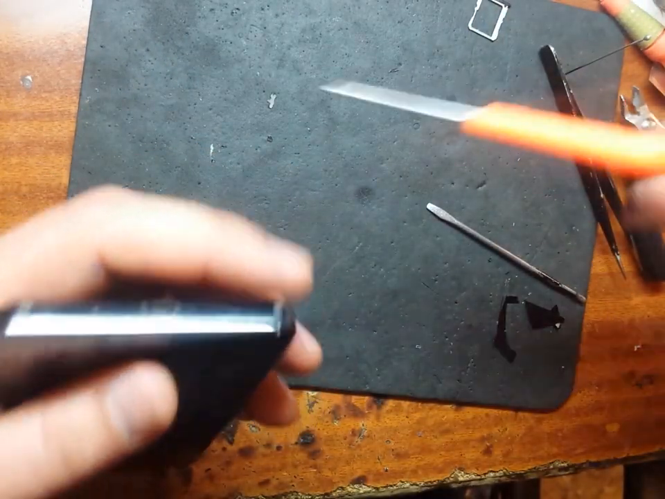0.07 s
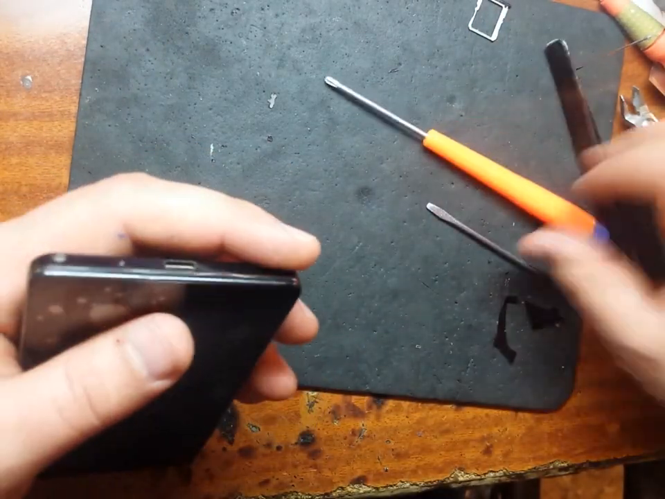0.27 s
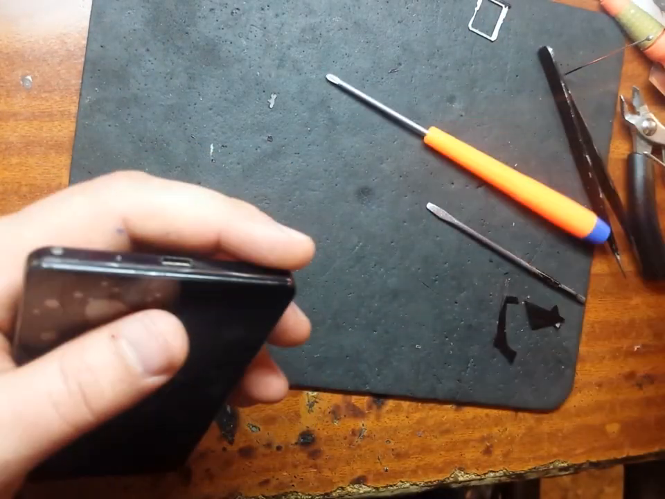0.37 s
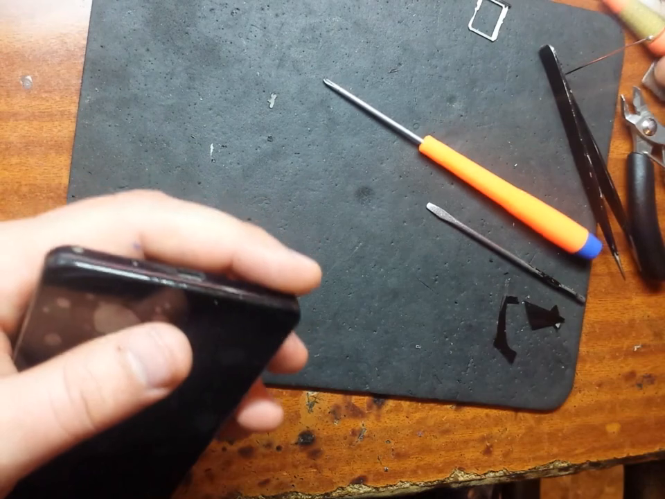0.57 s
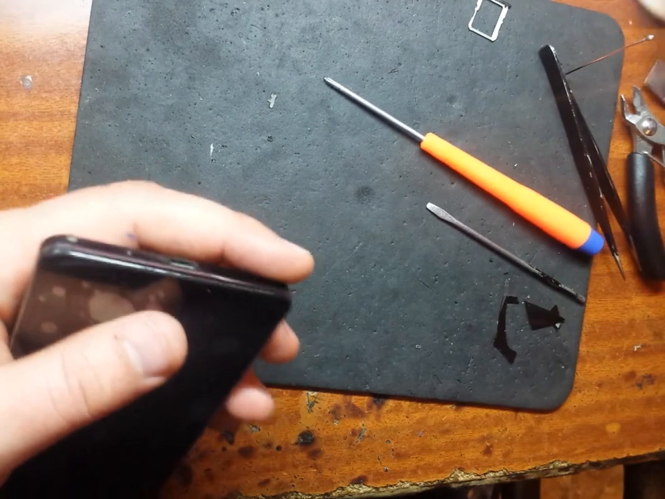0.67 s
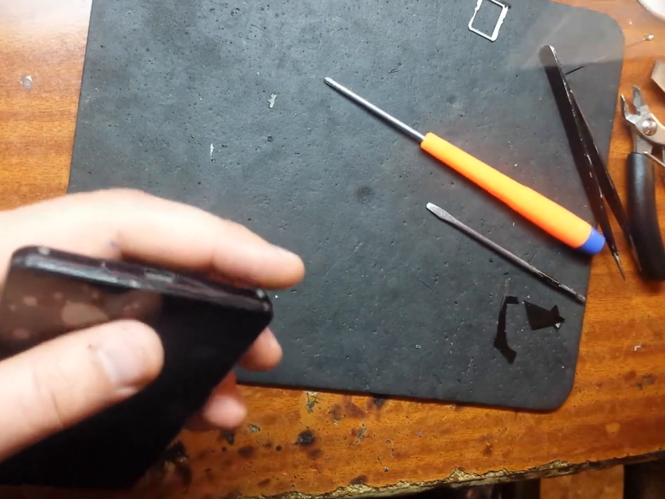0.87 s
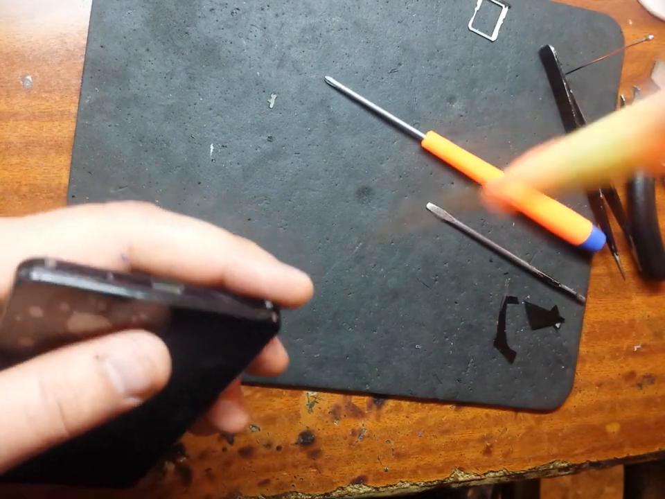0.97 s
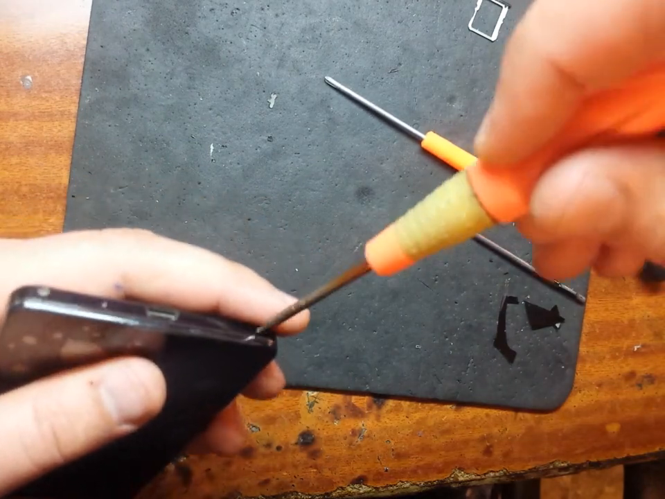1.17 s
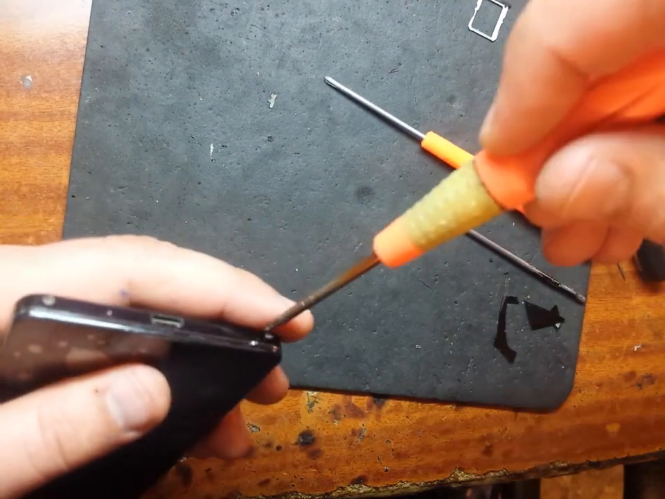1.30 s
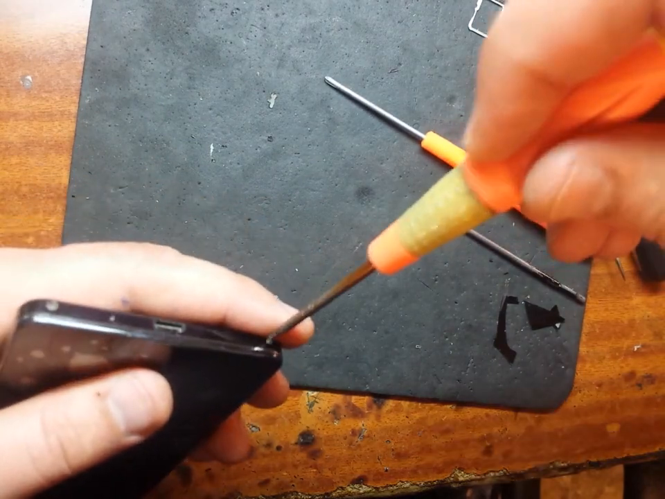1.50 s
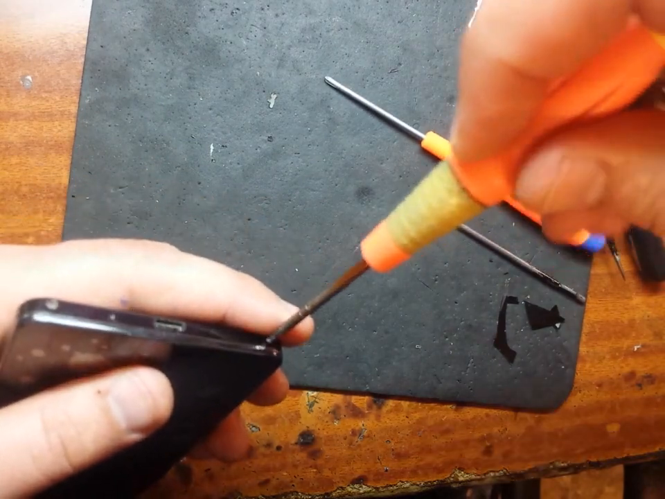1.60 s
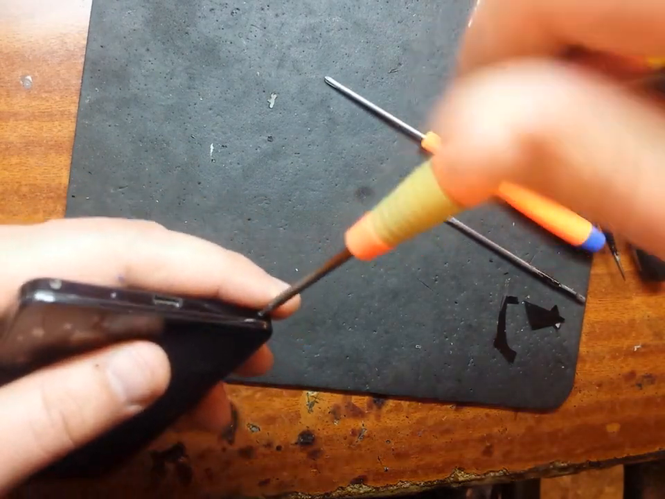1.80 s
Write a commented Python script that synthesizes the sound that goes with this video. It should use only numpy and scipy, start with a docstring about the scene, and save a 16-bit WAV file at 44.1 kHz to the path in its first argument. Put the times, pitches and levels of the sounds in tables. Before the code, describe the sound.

Screwdriver clatters down on a rubber-matted bench, another tool is picked up with knocks and clinks

```python
"""A small screwdriver is laid on a rubber mat over a wooden bench, bounces and settles; another tool is picked up,
clinking and knocking, then its tip ticks faintly on a phone. Each blow is a noisy snap plus fading sine waves.
Filtered grains of noise make rubbing and a soft midband wash under the knocks and clatter; random echoes stand
for the room. Shaped noise is the room tone; a preset curve imitates an automatic gain that ducks it around loud
blows and slowly lets it recover. Two microphone ports hear it, the left one brighter around its port resonance."""
import sys
import numpy as np
from scipy import signal
from scipy.fft import rfft, irfft
from scipy.io import wavfile
from scipy.ndimage import uniform_filter1d

SR = 44100
rng = np.random.default_rng(int(sys.argv[2]) if len(sys.argv) > 2 else 0)


def generate_wav(sig):
    """Save sig (samples, or channels by samples) to the path in sys.argv[1] as 16-bit PCM at SR."""
    pcm = np.round(np.clip(np.atleast_2d(sig).T, -1, 1) * 32767).astype(np.int16)
    wavfile.write(sys.argv[1], SR, pcm)


def ratio(d):
    """dB to gain"""
    e = np.asarray(d, float) / 20
    return 10 ** e


N = 81585  # length in samples

# Levels in the tables are those before the microphone ports. In the five lists of blows, chatter_s is at least
# 0.0002 and tilt_db_per_octave brightens or dulls the ring. In the mode lists, level_db only compares the modes
# with each other, and t60_s (time to fade by 60 dB) is at least 0.002 in use.
# Screwdriver shaft and tip touching: start_s, peak_db, chatter_s, tilt_db_per_octave
SHAFT_TICKS = [(.0962, -21.5, 0.00098, -2.5), (.167, -22, 0.0004, -7), (.2258, -17.5, 0.00036, -14),
               (.2294, -8, 0.00081, 4.5), (.2345, -16.5, 0.0004, -1), (.239, -27, .0005, -19),
               (.2932, -26, 0.00092, -19), (.3259, -2.5, 0.00019, -3.5), (.328, -4.5, 0.0018, -4),
               (.358, -13.5, 0.0044, 5.5), (.371, -15, 0.0017, -1), (.390, -16.5, 0.0017, -5.5),
               (.395, -19.5, 0.0032, 1.5), (.9238, -33.5, .001, -18), (1.2466, -36, 0.00028, 9.5),
               (1.5928, -38, 0.0028, -1), (1.7444, -31.5, 0.00134, -4)]
# How the shaft and tip ring: pitch_hz, level_db, t60_s
SHAFT_MODES = [(2490, -6, 0.003), (3640, -4, 0.0038), (4360, -5, 0.0069), (5000, -8, 0.0057),
               (5300, 1, 0.011), (5875, 4, 0.015), (6860, -10.5, 0.012), (8600, -11.5, 0.0071),
               (11900, -14.5, 0.0011), (14300, -30, .004)]
# Handle landing on the bench: start_s, peak_db, chatter_s, tilt_db_per_octave
HANDLE_THUMPS = [(.227, -24.5, 0.0005, 0.5), (.327, -23.5, 0.00067, 5), (.334, -16, 0.0006, 1)]
# How the bench rings: pitch_hz, level_db, t60_s
BENCH_RING = [(97.3, -3.5, 0.26), (136.5, 2, 0.25), (166, 1.5, 0.18), (255, 6, 0.02), (328, -1.5, 0.16),
              (378, -4.5, 0.099), (795, -5.5, 0.013)]
# Plastic handle knocking as it is lifted (each port has its own gain later):
# start_s, peak_db, chatter_s, tilt_db_per_octave
HANDLE_KNOCKS = [(.6042, -2.5, 0.00038, 1.5), (.608, -8, 0.0012, 2.5), (.6132, -10.5, 0.0012, -3),
                 (.6148, -7.5, 0.0005, -3), (.6162, -9, 0.00038, -4.5), (.6285, -19, 0.00055, -1),
                 (.6348, -20.5, 0.0008, -2.5)]
# How the plastic handle rings: pitch_hz, level_db, t60_s
HANDLE_MODES = [(296, -24, 0.088), (547, -20.5, 0.0344), (938, -24.5, 0.077), (1170, -14, 0.08),
                (1590, -0.5, 0.026), (2550, 2.5, 0.014), (3040, 1, 0.0049), (3600, 0, 0.015),
                (4500, -12.5, 0.0073), (5550, 2, 0.019), (6040, -0.5, 0.0074), (8580, -23, 0.012)]
# Steel parts clinking together: start_s, peak_db, chatter_s, tilt_db_per_octave
STEEL_CLINKS = [(.6955, -7, 0.0056, -9), (.698, 1, 0.00017, 0), (.6995, -5, 0.0023, 5.5),
                (.7325, -3, 0.0002, -1), (.7345, -9, 0.0012, -6), (.7502, -9.5, 0.00018, -7.5),
                (.7535, -10, 0.0013, -2), (.7628, -7, 0.00022, -1.5), (.766, -13, 0.0012, -3),
                (.772, -19, .002, -4), (.7795, -23, 0.00091, -7)]
# How the steel parts ring: pitch_hz, level_db, t60_s
STEEL_MODES = [(1330, -23.5, 0.007), (2420, -13, 0.008), (3560, -1.5, 0.0043), (3950, -1.5, 0.0045),
               (4734, -7.5, 0.017), (5520, 6.5, 0.0066), (6300, 2, 0.0048), (6550, -13, 0.036),
               (7970, -11, 0.0018), (9800, -25.5, 0.0019), (11600, -31.5, 0.0026), (15600, -26, 0.002)]
# A heavier tool clunking on the bench: start_s, peak_db, chatter_s, tilt_db_per_octave
HEAVY_CLUNKS = [(.7962, -18.5, 0.00076, -8.5), (.7988, -11.5, .0004, -0.5), (.8017, -3.5, 0.0013, 5),
                (.8048, -7.5, 0.000333, -2.5), (.814, -19.5, 0.0009, -7), (.8292, -8, 0.0017, -1),
                (.8318, -14.5, 0.00054, 0), (.8352, -21.5, 0.0028, -5), (.850, -28, 0.00091, -14.5)]
# How the heavier tool rings: pitch_hz, level_db, t60_s
HEAVY_MODES = [(125, -22, 0.075), (216, -16, 0.052), (356, -8, 0.052), (521, -4, 0.075), (754, -1.5, 0.076),
               (1045, 0, 0.025), (1320, 2.5, 0.027), (1588, 5, 0.012), (2356, 0, 0.0063), (2610, -4, 0.016),
               (3040, 3, 0.0096), (3740, -9, 0.0035), (5800, -10, 0.021)]
# Rubbing noise, and soft midband wash under the knocks and clatter (the rows near 1100 to 1500 Hz):
# start_s, length_s, rms_db (before the fade), pitch_hz (the band is set around it)
RUBS_AND_WASH = [(0.33, 0.12, -40, 5000), (0.536, 0.08, -40, 4500), (0.62, 0.089, -36, 1500),
                 (0.733, .055, -28, 4500), (.735, .17, -38, 1090), (1.668, 0.075, -62.5, 5550)]
# Room tone level as an automatic gain would duck it around loud blows and slowly let it recover:
# time_s, level_db
TONE_DUCKING = [(0, -38.5), (0.291, -40), (.32, -45), (.335, -39), (0.581, -38.5), (.6, -50), (.62, -37.5),
                (0.671, -37), (.695, -49.5), (.725, -42), (0.78, -43), (.9, -49), (1.0, -50.5),
                (1.3, -51.5), (1.68, -50), (1.77, -46), (1.85, -44)]
# Colour of the room tone, only comparing pitches with each other: pitch_hz, level_db_per_hz
TONE_COLOUR = [(30, -13.5), (60, -6.5), (85, -8), (127, -3.5), (200, -8.5), (340, -10), (590, -17),
               (880, -12.5), (1700, -17), (3500, -19.5), (5800, -20.5), (7000, -27.5), (9000, -39.5),
               (14000, -57), (15700, -66)]
# How alike the two ports hear the room, 1 being the same: pitch_hz, likeness
PORT_LIKENESS = [(60, 1), (180, 0.95), (550, 0.71), (1650, -0.12), (4970, 0.083), (15000, -0.11)]
# How much stronger the left port is than the right: pitch_hz, level_db
LEFT_BRIGHTER = [(60, 2.5), (300, 0), (900, 1.5), (1800, 3), (3400, 5.5), (5700, 15), (7000, 5), (8300, -1),
                 (12000, -7), (15000, -1)]
# How long the walls' echoes last: pitch_hz, t60_s
WALL_FADE = [(200, 0.37), (1000, 0.36), (3000, 0.19), (6500, 0.34), (11000, 0.082)]

ROOM_DB, NEAR_DB = -10, -11.5  # strength of wall echoes and bench scatter, before the treble cut
NEAR_T60_S, DULL_HZ = 0.02, 6800  # fade of the bench scatter, treble cut of all echoes
RISE_CYCLES = 0.31  # time constant of a mode's rise, in its own cycles
SIDE_DB, VARY_DB = -6, 1.5  # side modes under their centre, random spread of mode levels
GRIT, SHARED = 0.12, 0.14  # strength of the chatter, part of it common to both ports
SNAP_T60_S, SKIRT_DB = 0.0042, -35.5  # fade of the snap's noise, its fall an octave beyond the outer modes
RIGHT_LAG_S = 0.00022
MIC_LOW_HZ, EDGE_HZ = 50.6, 15900  # bass cut and upper limit of the ports


def screwdriver_ticks():
    """Shaft and tip ring in narrow clusters of high pitches at each touch."""
    return strikes(SHAFT_TICKS, SHAFT_MODES, 0.032, snap_db=-8.0)


def handle_thumps():
    """The landing handle makes the bench ring at low single pitches that all start the same way."""
    return strikes(HANDLE_THUMPS, BENCH_RING, 0.022, snap_db=-9, count=1, flip=0.94)


def handle_knocks():
    """The plastic handle rings in wide clusters behind a strong snap, louder at the left port."""
    left_right_db = [[1.5], [-4]]
    return strikes(HANDLE_KNOCKS, HANDLE_MODES, 0.075, snap_db=3.0) * ratio(left_right_db)


def steel_clinks():
    """Steel parts hit each other: a snap and brief, mostly high ringing."""
    return strikes(STEEL_CLINKS, STEEL_MODES, 0.065, snap_db=1.0)


def heavy_clunks():
    """A heavier tool hits the bench: a strong snap and lower, wide clusters."""
    return strikes(HEAVY_CLUNKS, HEAVY_MODES, 0.088, snap_db=4.0)


def strikes(rows, modes, spread, snap_db, count=5, flip=-1.006):
    """A blow with gritty chatter after it snaps and rings each mode as a cluster that takes part of a cycle to rise."""
    t, out = np.arange(SR // 2) / SR, np.zeros((2, N))
    hz, db, t60 = np.repeat(np.transpose(modes), count, axis=1)[:, :, None]
    octaves = np.log2(hz / np.median(hz))
    side = (np.arange(len(hz)) % count > 0)[:, None]  # all but the first of each cluster
    # a negative flip starts neighbouring modes in opposite directions
    turn = flip ** (np.arange(len(hz)) // count)[:, None]
    for s, peak_db, chatter_s, tilt_db in rows:
        vary_level, vary_sign, vary_pitch = rng.standard_normal((3, len(hz), 1))
        start_db = db + SIDE_DB * side + tilt_db * octaves + VARY_DB * vary_level
        fade = ratio(start_db - 60 * t / np.maximum(t60, .002))
        rise = 1 - np.exp(-t * hz / RISE_CYCLES)
        direction = np.where(side, np.sign(vary_sign), turn)
        pitch = hz * (1 + spread * side * vary_pitch)
        ring = (fade * rise * direction * np.sin(2 * np.pi * pitch * t)).sum(0)[None]
        ring = ring / abs(ring).max()
        add(ring, 0, ratio(snap_db) * snap(modes, tilt_db)[None])  # the snap leads

        both, own = rng.standard_normal((2, 800))
        chatter = np.array([both, SHARED * both + np.sqrt(1 - SHARED ** 2) * own])
        chatter = GRIT * chatter * np.exp(-t[:800] / max(chatter_s, .0002))
        chatter[:, 0] = 1  # the main contact
        sound = signal.fftconvolve(ring, flattened(chatter, size=9), axes=1)
        add(out, s, ratio(peak_db) * sound / abs(sound).max())
    return out


def snap(modes, tilt_db):
    """The first instant of contact: a click and brief noise, coloured like the modes but with no gaps between them."""
    hz, db, _ = np.transpose(modes)
    outline = [(hz[0] / 2, db[0] + SKIRT_DB), *zip(hz, db), (hz[-1] * 2, db[-1] + SKIRT_DB)]
    f = abs(np.fft.fftfreq(2048, 1 / SR))
    octaves = np.log2(np.clip(f, hz[0], hz[-1]) / np.median(hz))
    log_gain = np.log(ratio(read(outline, f) + tilt_db * octaves))
    # minimum phase: the energy comes as early as this colour allows
    colour = np.fft.ifft(np.exp(np.conj(signal.hilbert(log_gain)))).real[:1024]
    burst = rng.standard_normal(1024) * ratio(-60 * np.arange(1024) / SR / SNAP_T60_S)
    burst[0] = 7  # the click
    sound = np.convolve(colour, burst)
    return sound / abs(sound).max()


def rubs_and_wash():
    """Rubbing and midband wash: dense uneven grains in a broad band, quick to start and fading out."""
    out = np.zeros((2, N))
    for s, length, db, hz in RUBS_AND_WASH:
        t = np.arange(0, length, 1 / SR)
        strength = np.minimum(rng.exponential(1, len(t) // 40 + 1), 2)  # new every 40 samples
        grains = rng.standard_normal((2, len(t))) * ratio(3.5 * np.repeat(strength, 40)[:len(t)])
        band = signal.lfilter(*signal.butter(2, [hz * 0.36, hz * 1.22], "band", fs=SR), grains)
        add(out, s, ratio(db) * evened(band) * np.sin(np.pi * (t / length) ** 0.24))
    return out


def room(x):
    """Sparse taps of random sign: a quick scatter off the bench, then walls with each band dying at its own speed."""
    taps = np.zeros((2, SR // 2))
    at = np.arange(40, SR // 2 - 20, 20) + rng.integers(0, 20, (2, (SR // 2 - 41) // 20))
    np.put_along_axis(taps, at, rng.choice([-1., 1.], at.shape), 1)
    hz, t, (left, other) = signal.stft(taps, SR, nperseg=256)
    z = np.array([left, alike(left, other, hz)])
    near = signal.istft(z * ratio(-60 * t / NEAR_T60_S), SR, nperseg=256)[1]
    far = signal.istft(z * ratio(-60 * t / read(WALL_FADE, hz)[:, None]), SR, nperseg=256)[1]
    tail = ratio(NEAR_DB) * near / np.linalg.norm(near[0])
    tail = tail + ratio(ROOM_DB) * far / np.linalg.norm(far[0])
    tail = flattened(tail, size=60) * np.linalg.norm(tail[0])
    tail = signal.lfilter(*signal.butter(2, DULL_HZ, fs=SR), tail)  # the echoes carry little treble
    return signal.fftconvolve(x, tail, axes=1)[:, :N]


def room_tone():
    """Random short-time spectra, closely alike at both ports in the bass only, gently patchy, then ducked."""
    frames, hz = N // 256 + 5, np.fft.rfftfreq(1024, 1 / SR)
    a, b, c, d, patches = rng.standard_normal((frames, 513, 5)).T
    patches = uniform_filter1d(patches, size=10, axis=0)  # smooth over pitch
    patches = evened(uniform_filter1d(patches, size=8, axis=1))  # and over time
    left, other = a + 1j * b, c + 1j * d
    z = np.array([left, alike(left, other, hz)])
    z *= ratio(read(TONE_COLOUR, hz)[:, None] + 1.58 * patches)
    level = ratio(np.interp(np.arange(N) / SR, *np.transpose(TONE_DUCKING)))
    return level * evened(signal.istft(z, nperseg=1024, noverlap=768)[1][:, :N])


def alike(left, other, hz):
    """Mixes left and unrelated spectra into a right one, as alike at each pitch as the two ports are."""
    same = np.clip(read(PORT_LIKENESS, hz), -1, 1)[:, None]
    return same * left + np.sqrt(1 - same ** 2) * other


def flattened(x, size):
    """Evens out the broad colour of a random response, then fades it from its middle to three quarters."""
    z, n = rfft(x), x.shape[-1]
    even = irfft(z / np.sqrt(uniform_filter1d(abs(z) ** 2, size, axis=-1)), n)
    return even * np.clip(np.linspace(3, -1, n), 0, 1)


def evened(x):
    """Scales to rms 1."""
    return x / np.sqrt(np.mean(x ** 2) + 1e-20)


def read(points, hz):
    """Reads a table along log frequency."""
    f, value = np.transpose(points)
    return np.interp(np.log(hz + 1), np.log(f + 1), value)


def add(mix, s, sound):
    """Lays a sound into the mix at time s."""
    part = mix[:, round(s * SR):][:, :sound.shape[1]]
    part += sound[:, :part.shape[1]]


def scene():
    """Tools and wash, a little later at the right port, and their echoes, with the bench thumps and room tone."""
    tools = screwdriver_ticks() + handle_knocks() + rubs_and_wash() + steel_clinks() + heavy_clunks()
    tools = np.array([tools[0], np.roll(tools[1], round(RIGHT_LAG_S * SR))])
    return tools + room(tools) + handle_thumps() + room_tone()


def roll_off(x):
    """The treble ends steeply here."""
    return signal.sosfilt(signal.butter(12, 15810, fs=SR, output="sos"), x)


def record(dry):
    """The right port is duller in the presence range; both get a gain, bass cut, upper limit and clipping."""
    hz = np.linspace(0, SR / 2, 257)
    right = signal.firwin2(255, hz, ratio(-read(LEFT_BRIGHTER, hz)), fs=SR)
    ports = np.array([dry[0], signal.oaconvolve(dry[1], right, "same")]) * ratio(3.0)
    ports = signal.sosfilt(signal.butter(2, MIC_LOW_HZ, "high", fs=SR, output="sos"), ports)
    edge = signal.firwin(255, EDGE_HZ, window=("kaiser", 9), fs=SR)
    mix = np.clip(signal.oaconvolve(ports, edge[None], "same"), -1, 1)
    return roll_off(mix)


dry = scene()
out = record(dry)
generate_wav(out)
```